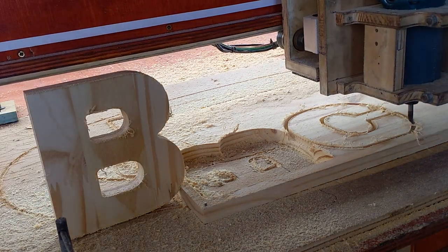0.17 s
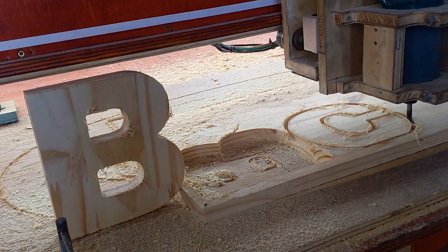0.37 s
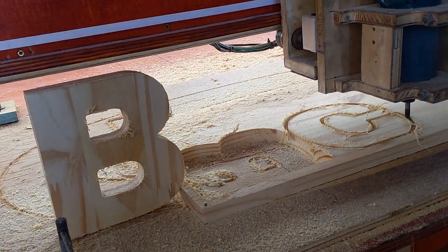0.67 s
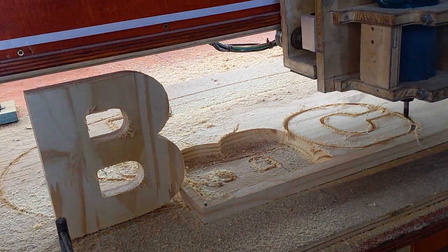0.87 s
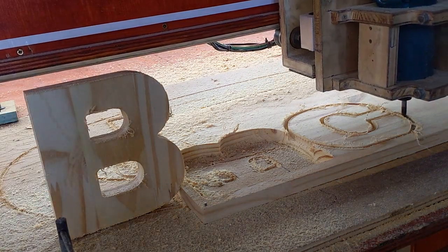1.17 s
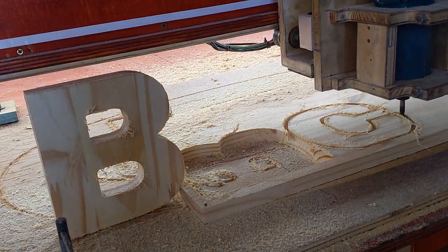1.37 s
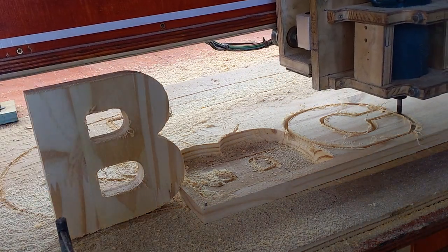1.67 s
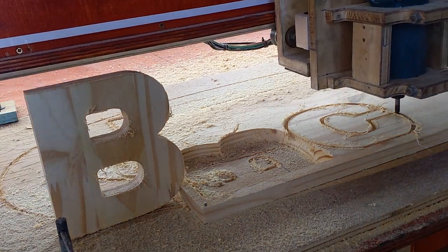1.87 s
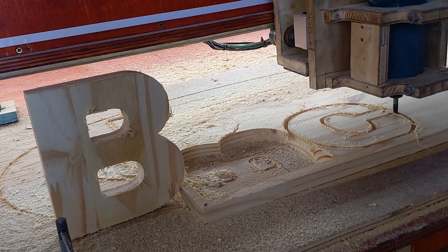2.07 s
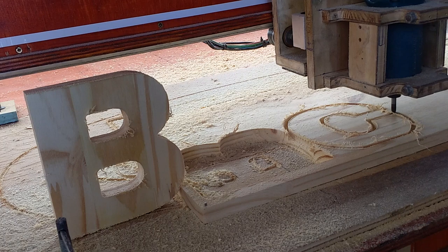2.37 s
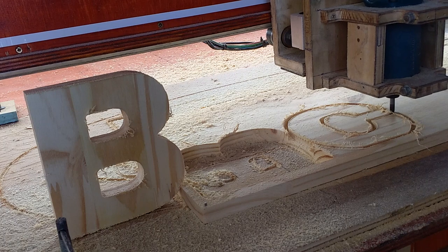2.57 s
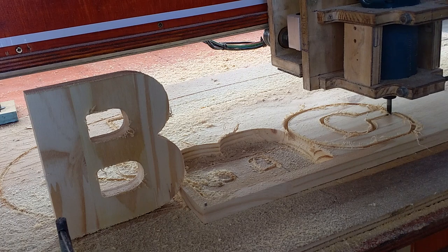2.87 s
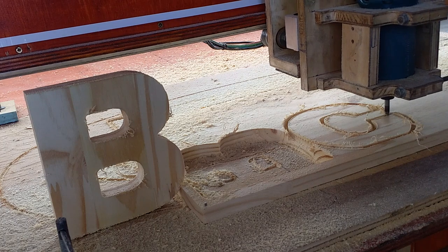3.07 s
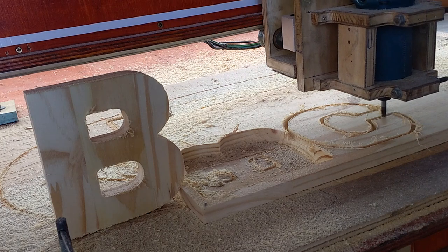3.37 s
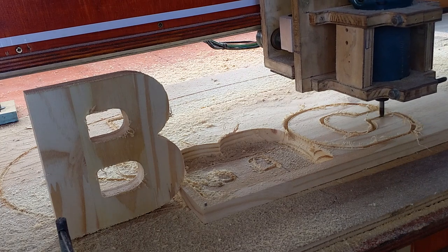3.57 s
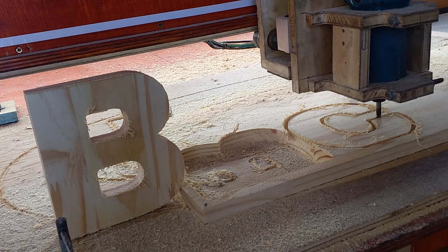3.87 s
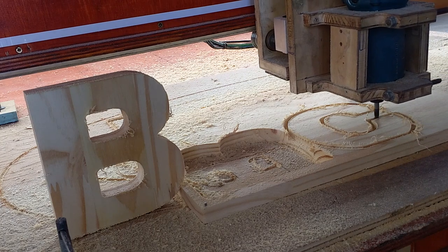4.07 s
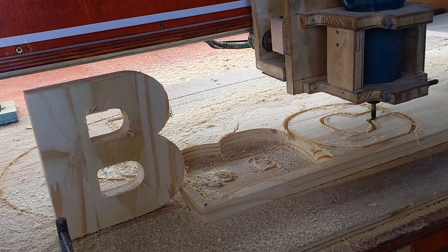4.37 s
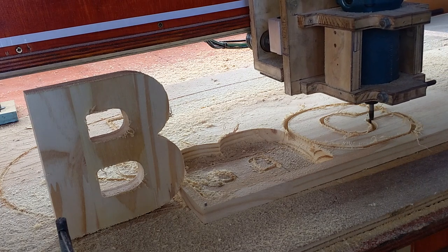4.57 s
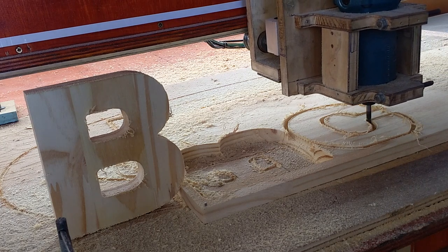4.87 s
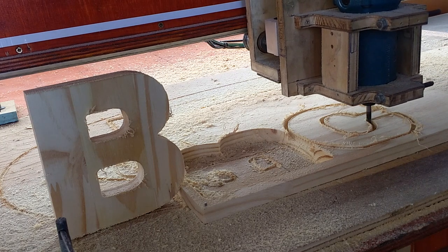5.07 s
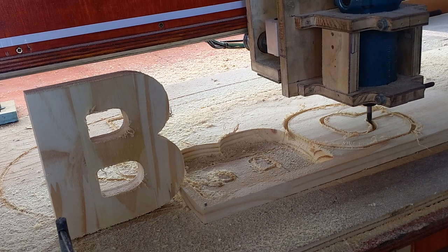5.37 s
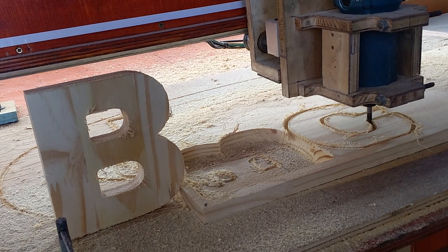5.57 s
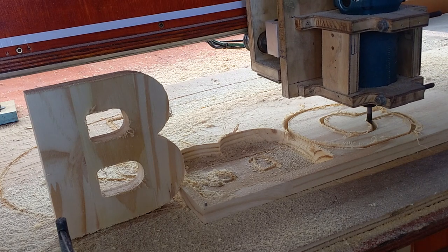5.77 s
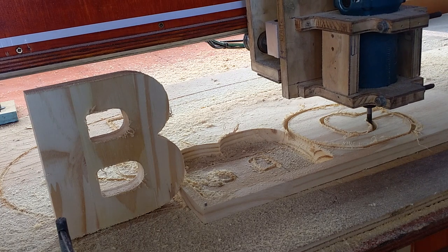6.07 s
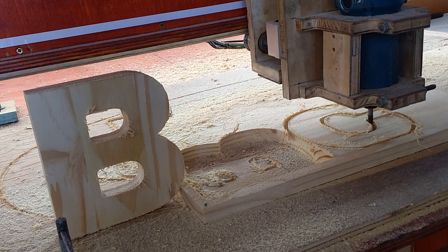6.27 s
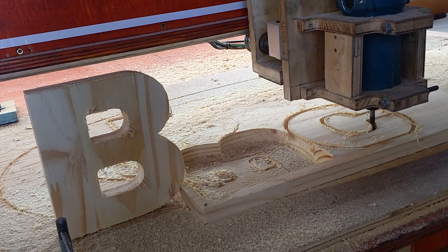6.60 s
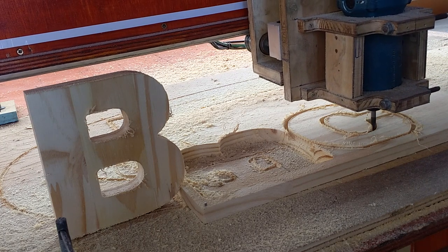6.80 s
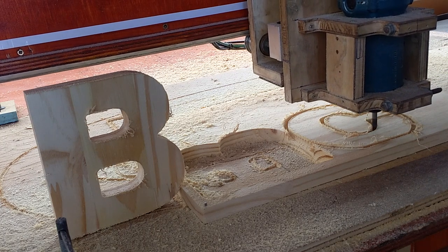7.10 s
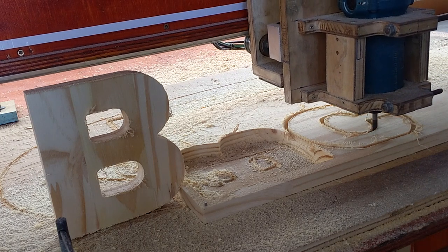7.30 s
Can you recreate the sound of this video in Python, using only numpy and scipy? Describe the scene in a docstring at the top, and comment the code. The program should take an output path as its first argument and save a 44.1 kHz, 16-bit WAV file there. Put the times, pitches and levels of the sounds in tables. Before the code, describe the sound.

A router bit cuts wood in a workshop, close to a stereo microphone, already at full speed and never stopping. Its mid-pitched motor whine, around 490 turns a second, carries a dense, raspy buzz and a thin high fan whistle over steady roaring air and bright fibrous hiss. In the first second the pitch sags slightly, with quick squeals and a touch of rough chatter. From 0.9 seconds it climbs; a longer grainy chatter roughens 1.6 to 2.2. The hum swells around 2.6 to 3.3, then eases while the pitch keeps creeping upward. From 4.8 it rises more clearly, the buzz softens, and a strong hum dominates 5.4 to 6.2 at the highest pitch. After 6.2 the speed sags again, with sharp squeals and a harsher bite through the cut-off at about 7.4. Tones shift between left and right; faint low rumble stays beneath.

```python
"""A CNC router cuts a groove in a wooden board, in a workshop, close to a stereo microphone.
The spindle sings on the multiples of its speed, which sags under load; the bit squeals and buzzes
on upper multiples and at times chatters halfway between them. The motor's cooling fan adds a blade
whistle, and its air and the torn fibres make coloured noise. The moving frame rumbles low."""
import sys
import numpy as np
from scipy import signal
from scipy.fft import rfft, irfft, next_fast_len
from scipy.io import wavfile
from scipy.ndimage import uniform_filter1d, minimum_filter1d, map_coordinates

SR = 44100
rng = np.random.default_rng(int(sys.argv[2]) if len(sys.argv) > 2 else 0)


def digitize_waveform(pressure):
    """Quantize a signal to 16-bit integers and store it at the path in sys.argv[1].

    Rows of a 2-D input are taken as channels; values are limited to [-1, 1].
    """
    field = np.atleast_2d(pressure).T
    bounded = np.clip(field, -1, 1)
    quanta = np.round(bounded * 32767).astype(np.int16)
    wavfile.write(sys.argv[1], SR, quanta)


N = 328085

# Spindle speed. Each row: time in seconds, speed in turns a second.
SPINDLE_SPEED = [(0.0, 489), (0.22, 489.4), (0.53, 486), (0.67, 486.8), (0.89, 484.5), (1.48, 500),
                 (1.56, 502), (2.41, 522), (3.62, 527.4), (4.34, 535), (4.73, 535), (4.85, 538),
                 (5.38, 551.8), (5.84, 552.9), (6.2, 552.0), (6.39, 547), (6.89, 534), (7.43, 528)]
# Hum of the cut, once a turn. Each row: time in seconds, level in dB.
HUM_LEVEL = [(0.0, -20), (0.88, -14), (1.22, -18), (1.44, -15.7), (1.93, -18), (2.02, -15.8), (2.38, -19.5),
             (2.59, -14.5), (2.96, -13.5), (3.25, -13.5), (3.44, -18), (5.16, -17.5), (5.44, -11.2),
             (5.92, -9), (6.22, -9.5), (6.37, -14), (7.15, -18.5), (7.43, -16.5)]
# The lowest tone shifts between left and right as the head travels.
# Each row: time in seconds, left over right in dB, left lead in radians.
HUM_PLACE = [(0.0, 3.5, -0.7), (0.9, -2.5, 0), (1.15, -0.5, -0.9), (1.4, -14.5, -3), (1.56, 1, -3),
             (1.85, 7, -5), (2.02, 2, -5.5), (2.28, 9, -5.5), (2.45, -0.5, -6), (4.35, -3.0, -6.5),
             (4.85, -2.0, -5.5), (5.0, 7, -5.5), (5.22, -5, -6), (6.36, -3, -6), (6.67, 5.5, -5.5),
             (6.93, -5, -5.5), (7.43, 2, -6)]
# How hard the edge bites. Each row: time in seconds, lift of the upper orders in dB.
BITE = [(0, 1), (.3, 2.5), (1, 0), (1.5, 3.5), (1.9, 2), (2.3, -2.5), (3, 1), (3.9, -1), (4.2, 0.5),
        (5, -5), (5.6, -3), (6.1, -3), (6.35, 2.5), (6.9, 2), (7.4, 3)]
# Upper spindle orders. Each row: multiple of the speed, level in dB before the bite's lift.
BUZZ_ORDERS = [(5, -33.5), (9, -37), (10, -38), (11, -38.5), (12, -39), (13, -42.5), (14, -44.5), (15, -47),
               (17, -55), (18, -52), (19, -58), (20, -56), (21, -55), (22, -52), (23, -54), (24, -51),
               (25, -54), (26, -57)]
# Orders in which the bit squeals. Each row: multiple of the speed, resting level in dB, dB per dB of bite.
SQUEAL_ORDERS = [(4, -33, 1.1), (6, -34, .5), (7, -34, 1), (8, -32.5, 0.1)]
# The bit catches in the grain and one order rings out; rows at the 16th multiple instead swell the fan's blade
# whistle. Each row: start in seconds, length in seconds, multiple of the speed, rise in dB at full swell.
SQUEALS = [(0, 0.21, 2, 8), (.12, 0.22, 6, 9.5), (.17, 0.22, 3, 7.5), (0.405, 0.5, 2, 7),
           (.6, 0.21, 7, 11.5), (0.636, .46, 3, 3.5), (1.05, .43, 3, 6.5), (1.2, 0.45, 8, 4.5),
           (1.52, .22, 2, 3.5), (1.68, 0.21, 3, 5.5), (2.18, 0.26, 3, 10), (2.25, 0.12, 6, 10),
           (2.48, 0.3, 3, 7.5), (2.639, 0.49, 2, 2.5), (2.66, 0.38, 4, 6), (3.42, 0.27, 4, 2),
           (3.4, 0.82, 8, 4.5), (4.07, .15, 2, 5), (4.1, 0.48, 16, 3.5), (4.8, 0.71, 2, 3.5),
           (4.89, .24, 16, 3.5), (5.97, .26, 3, 7.5), (6.08, .19, 2, 5.5), (6.18, 0.23, 4, 2),
           (6.24, 0.19, 6, 9.5), (6.43, 0.17, 7, 10), (7.08, .35, 3, 4), (7.1, 0.25, 7, 7),
           (7.2, .15, 6, 8)]
# One order drops away for a moment; the row at the 5th multiple goes unheard, since the buzz orders take no
# lulls. Each row: start in seconds, length in seconds, multiple of the speed, depth in dB at full swell.
LULLS = [(-.05, .18, 3, 7), (1.303, .2, 2, 6), (1.5, .4, 7, 6), (1.756, 0.56, 2, 4.5), (1.791, 0.19, 3, 8),
         (2.362, 0.29, 16, 4.5), (2.6, 1.98, 5, 3), (3.02, 0.17, 3, 6.5), (3.05, .28, 16, 5),
         (3.67, 0.4, 2, 8.5), (4.266, 0.47, 3, 8), (4.95, .4, 4, 6), (6.19, .1, 3, 9), (6.24, .16, 2, 11),
         (6.22, 0.19, 16, 12), (6.9, 0.64, 2, 3)]
# The housing passes the blade tone best near its resonance.
# Each row: blade pitch in Hz, level in dB, left over right in dB.
HOUSING = [(7750, -44, -1), (7850, -43, -4), (8370, -28.5, 2), (8300, -29, -5), (8726, -33, 5),
           (8760, -29, 7), (8860, -40.5, 13)]
# Bearing tones, one cage turn below the orders. Each row: multiple of the speed, level in dB.
BEARING_TONES = [(2.6, -50), (3.6, -47), (4.601, -80), (5.6, -41.5), (6.6, -55), (7.6, -43.5)]
# How much wood the bit tears out. Each row: time in seconds, lift of roar and hiss alike in dB.
TORN_WOOD = [(0, 0), (0.9, -0.2), (1.8, 1.1), (2.8, -0.4), (3.8, 0), (4.1, -2), (4.7, -1.7), (4.9, -0.5),
             (5.75, -0.5), (5.95, 0.5), (6.5, -1.5), (7.43, -1.9)]
# Noise colours, before scaling to rms 1. Each row: frequency in Hz, relative level in dB.
ROAR_COLOUR = [(100, -47), (320, -25.5), (480, -10.5), (660, -10.5), (760, -6.5), (910, 1.5), (1130, -7),
               (1400, -3.5), (1900, -8), (2800, -14.5), (6000, -60)]
HISS_COLOUR = [(200, -70), (500, -37), (1300, -37), (2100, 0.5), (2430, -7.5), (2750, -0.5), (4300, -1.5),
               (5500, -3), (7000, -8.5), (9000, -7.5), (11000, -14.5), (13500, -16), (15000, -24),
               (15600, -32)]
RUMBLE_COLOUR = [(25, -13), (60, -12.5), (120, -3), (230, -2), (350, -2.5), (800, -40), (3000, -70)]
# The bit bites deeper every second turn.
# Each row: start in seconds, length in seconds, gain on the chatter tones in dB at full swell.
CHATTER_BURSTS = [(0.273, 0.32, -36.5), (.7, 0.22, -40), (1.586, 0.597, -33)]
# Chatter tones. Each row: multiple of the speed, level in dB before the burst's gain.
CHATTER_TONES = [(.5, -21), (1.5, -1.5), (2.5, -2), (3.5, -6), (4.5, -9), (5.5, -7)]
# Left-right likeness, before the widening's swing. Each row: frequency in Hz, strength from 0 to 1.
LIKENESS = [(150, 0.2), (550, 0.97), (740, 0.91), (1400, 1), (1950, 0.83), (2450, 1), (3700, 0.78),
            (5000, 0.85), (7550, 0.72), (8700, 0.26), (10200, 0.21), (15000, .15)]
# Balance of the stereo microphone. Each row: frequency in Hz, left over right in dB.
BALANCE_DB = [(600, -0.5), (900, 0), (1600, -2), (2450, -0.5), (3300, -1), (5000, -0.2), (9000, -0.6),
              (11000, -4), (14000, -8)]

FREE_SPEED_HZ = 560.4  # turns a second; the sag below it tells the load
FAN_BLADES = 16
# the 2nd order grows with the hum and shrinks with the bite; the 3rd grows with the bite: dB, dB per dB
SECOND_DB, SECOND_PER_HUM, SECOND_PER_BITE = -23, 0.68, -0.2
THIRD_DB, THIRD_PER_BITE = -25, .15
SWELL_ATTACK_S, SWELL_RELEASE_S = .05, 0.065
# levels before the cut and load lift them, in dB; then dB per turn a second of sag
ROAR_DB, HISS_DB, HISS_PER_SAG = -26.5, -25, 0.011
# level at free speed and average hum in dB; dB per turn a second of sag; dB per dB of hum
GANTRY_DB, GANTRY_PER_SAG, GANTRY_PER_HUM = -58, .065, 0.34
# faint chatter between the bursts, stronger as the spindle slows:
# gain at free speed in dB; dB per turn a second of sag
CHATTER_REST_DB, CHATTER_PER_SAG = -60.5, .22
# stereo widening: left and right first oppose at the hollow, swing back and forth every ripple above it,
# and below AGREE_HZ do not swing
FIRST_HOLLOW_HZ, RIPPLE_HZ, AGREE_HZ = 2410, 2570, 1345
TOP_HZ = 15400  # upper band limit
HALF_SPLIT = np.array([[.5], [-.5]])  # shares a difference between left and right


def amp(db):
    """Decibels to gain."""
    return 10 ** (np.asarray(db) / 20)


def unit(x):
    """Scale to rms 1."""
    return x / np.sqrt(np.mean(np.abs(x) ** 2) + 1e-20)


def along(points, hz):
    """Read (Hz, value) points on a log axis."""
    f, v = np.transpose(points)
    return np.interp(np.log(hz + 1), np.log(f + 1), v)


def curves(rows):
    """One value per sample for each column after the time."""
    s, *cols = np.transpose(rows)
    return [np.interp(np.arange(N) / SR, s, c) for c in cols]


def wobble(rate, size=32):
    """A smooth random curve, rate knots a second."""
    coarse = np.arange(0, N + size, size)
    knots = rng.standard_normal(int(N * rate / SR) + 4)
    smooth = map_coordinates(knots, [coarse * rate / SR])
    return np.interp(np.arange(N), coarse, smooth)


def flutter(rate):
    """A random phasor of rms 1: strength and phase both wander."""
    return unit(wobble(rate) + 1j * wobble(rate))


def filtered(x, response):
    """x times a response of frequency."""
    m = next_fast_len(N + SR // 4)
    return irfft(rfft(x, m) * response(np.fft.rfftfreq(m, 1 / SR)), m)[..., :N]


def placed(pan_db):
    """Left and right gains of constant total power."""
    gains = amp(HALF_SPLIT * pan_db)
    return gains / np.sqrt(np.mean(gains ** 2, axis=0))


def swell(start, length):
    """Attack, hold and release, from 0 up to at most 1 and back."""
    t = np.arange(N) / SR - start
    return np.clip(np.minimum(t / SWELL_ATTACK_S, (length - t) / SWELL_RELEASE_S), 0, 1)


def squeal_db(order):
    """How far one order stands above or below its resting level as it swells and drops away."""
    rise = sum(db * swell(start, length) for start, length, k, db in SQUEALS if k == order)
    drop = sum(db * swell(start, length) for start, length, k, db in LULLS if k == order)
    return rise - drop


def mid_side(hz):
    """Mid and side gains of the stereo widening: with rising pitch, left and right swing
    between agreeing and opposing."""
    period = np.where(hz < FIRST_HOLLOW_HZ, 2 * (FIRST_HOLLOW_HZ - AGREE_HZ), RIPPLE_HZ)
    swing = -np.cos(2 * np.pi * np.maximum((hz - FIRST_HOLLOW_HZ) / period, -.5))
    alike = np.clip(along(LIKENESS, hz), 0, .995) * swing
    return np.sqrt([(1 + alike) / 2, (1 - alike) / 2])


def rush(spectrum, patchy_db):
    """Coloured stereo noise of rms 1 with patches of random gain in time and frequency."""
    z = signal.stft(rng.standard_normal((2, N)), nperseg=512)[2]
    field = uniform_filter1d(rng.standard_normal(z.shape[1:]), size=6, axis=0)
    field = uniform_filter1d(field, size=10, axis=1)
    pair = signal.istft(z * amp(patchy_db * unit(field)), nperseg=512)[1][:, :N]
    mid, side = filtered(pair, lambda hz: amp(along(spectrum, hz)) * mid_side(hz))
    return unit(np.array([mid + side, mid - side]))


def tone(multiple, speed, angle, scatter, rate, rasp):
    """One order near rms 1: reflections make it fade and drift as the head moves, uneven bites make it rasp."""
    # sound off the board arrives from other angles and partly fills the hollows
    reflected = .15
    mid_gain, side_gain = mid_side(multiple * speed)
    mid_gain = np.sqrt(mid_gain ** 2 + reflected * side_gain ** 2)
    side_gain = np.sqrt(1 - reflected) * side_gain
    mid = mid_gain * unit(1 + scatter * flutter(rate))
    # a quarter turn ahead or behind, so neither side is favoured
    side = side_gain * unit(1j * rng.choice([-1, 1]) + scatter * flutter(rate))
    carrier = np.exp(1j * multiple * angle + 2j * np.pi * rng.random())
    carrier = carrier * unit(1 + rasp * flutter(90))
    return np.sqrt(2) * (np.array([mid + side, mid - side]) * carrier).real


def hum(speed, angle):
    """The three lowest orders, radiated by the board and the motor housing."""
    hum_db, = curves(HUM_LEVEL)
    bite_db, = curves(BITE)
    pan_db, lead = curves(HUM_PLACE)
    louder_db = hum_db - hum_db.mean()
    second_db = SECOND_DB + SECOND_PER_HUM * louder_db + SECOND_PER_BITE * bite_db + squeal_db(order=2)
    third_db = THIRD_DB + THIRD_PER_BITE * bite_db + squeal_db(order=3)
    left_right = np.sqrt(2) * placed(pan_db) * np.cos(angle + HALF_SPLIT * lead)
    first = amp(hum_db + 0.42 * wobble(38) + 0.71 * wobble(14)) * left_right
    second = tone(2, speed, angle, scatter=0.19, rate=18, rasp=0.095)
    second = amp(second_db + .9 * wobble(22)) * second
    third = tone(3, speed, angle, scatter=0.25, rate=22, rasp=0.14)
    third = amp(third_db + 1.3 * wobble(22)) * placed(pan_db=-1.0) * third
    return first + second + third


def bit(speed, angle):
    """The edge strikes the wood each turn: a squeal and a buzz of upper orders, stirred by the passing grain."""
    bite_db, = curves(BITE)
    squeal = 0
    for k, db, per_bite in SQUEAL_ORDERS:
        level_db = db + per_bite * bite_db + squeal_db(order=k) + 1.3 * wobble(24)
        squeal = squeal + amp(level_db) * tone(k, speed, angle, scatter=0.4, rate=24, rasp=0.21)
    buzz = sum(amp(db) * tone(k, speed, angle, scatter=0.9, rate=24, rasp=0.39) for k, db in BUZZ_ORDERS)
    grain = wobble(22)
    return amp(1.2 * grain) * squeal + amp(bite_db + 0.64 * grain) * buzz


def motor(speed, angle):
    """The fan's blade whistle, strongest near the housing's resonance, and the faint tones of the bearings."""
    hz, levels_db, pans_db = np.transpose(HOUSING)
    pitch = FAN_BLADES * speed
    blades = tone(FAN_BLADES, speed, angle, scatter=0.3, rate=30, rasp=0.3)
    level_db = np.interp(pitch, hz, levels_db) + squeal_db(order=FAN_BLADES) + 2.1 * wobble(13)
    whistle = amp(level_db) * placed(np.interp(pitch, hz, pans_db)) * blades
    bearing = sum(amp(db) * tone(k, speed, angle, scatter=0.6, rate=6.6, rasp=0.26)
                  for k, db in BEARING_TONES)
    return whistle + bearing


def air_and_chips(sag, angle):
    """Fan air and torn fibres: a low roar, and a hiss that pulses lightly each turn and grows under load."""
    cut_db, = curves(TORN_WOOD)
    roar = amp(ROAR_DB + cut_db + 0.88 * wobble(14)) * rush(ROAR_COLOUR, patchy_db=0.6)
    hiss_db = HISS_DB + cut_db + HISS_PER_SAG * sag + 0.73 * wobble(20)
    hiss = amp(hiss_db) * rush(HISS_COLOUR, patchy_db=0.83)
    return roar + hiss * (1 + 0.032 * np.cos(angle))


def gantry(sag):
    """The moving frame rumbles below the spindle, more under load and when the cut hums loudly."""
    hum_db, = curves(HUM_LEVEL)
    shaken_db = GANTRY_PER_SAG * sag + GANTRY_PER_HUM * (hum_db - hum_db.mean())
    return amp(GANTRY_DB + shaken_db + 1.6 * wobble(5.5)) * rush(RUMBLE_COLOUR, patchy_db=1)


def chatter(speed, sag, angle):
    """Alternating deep and shallow bites sound halfway between the orders: in bursts, and faintly between
    them, stronger as the spindle slows."""
    halves = sum(amp(db) * tone(k, speed, angle, scatter=0.55, rate=9.95, rasp=.12)
                 for k, db in CHATTER_TONES)
    faint = amp(CHATTER_REST_DB + CHATTER_PER_SAG * sag)
    bursts = sum(amp(db) * swell(start, length) for start, length, db in CHATTER_BURSTS)
    return (faint + bursts) * halves


def scene():
    """Every tone follows the one spindle, whose speed sags and trembles under the load."""
    speed = curves(SPINDLE_SPEED)[0] + 0.25 * wobble(14)
    sag = FREE_SPEED_HZ - speed
    angle = 2 * np.pi * np.cumsum(speed) / SR
    tones = hum(speed, angle) + bit(speed, angle) + motor(speed, angle)
    noises = air_and_chips(sag, angle) + gantry(sag)
    return tones + noises + chatter(speed, sag, angle)


def limiter(x):
    """Turn the gain down smoothly wherever a peak would pass full scale."""
    needed = 1 / np.maximum(np.abs(x).max(axis=0) / .995, 1)
    return x * uniform_filter1d(minimum_filter1d(needed, size=441), size=441)  # 10 ms


def record(dry):
    """The microphone's left side is duller than the right; peaks are held and the top of the band is cut."""
    heard = filtered(dry, lambda hz: amp(HALF_SPLIT * along(BALANCE_DB, hz)))
    return filtered(limiter(heard), lambda hz: hz < TOP_HZ)


dry = scene()
out = record(dry)
digitize_waveform(out)
```